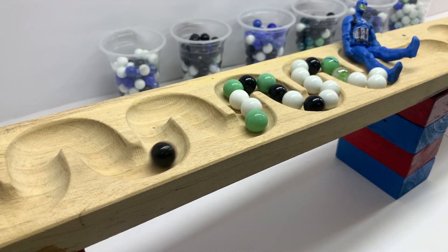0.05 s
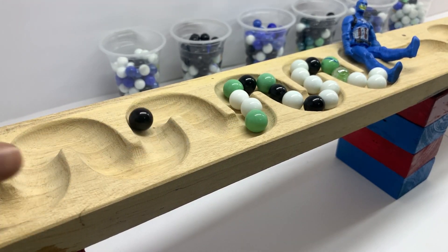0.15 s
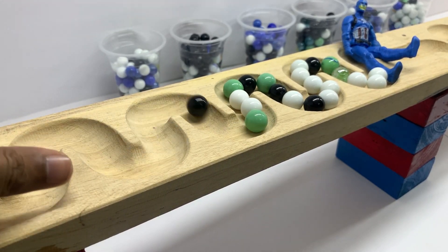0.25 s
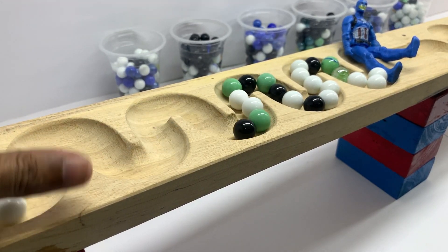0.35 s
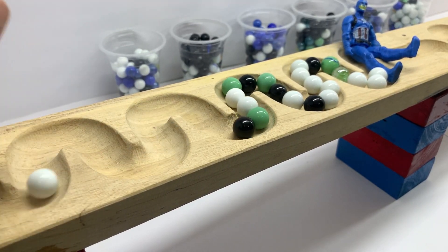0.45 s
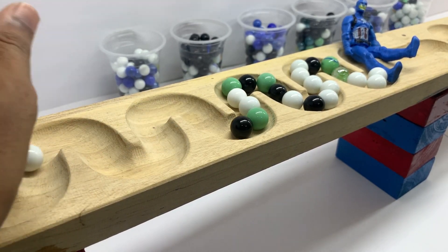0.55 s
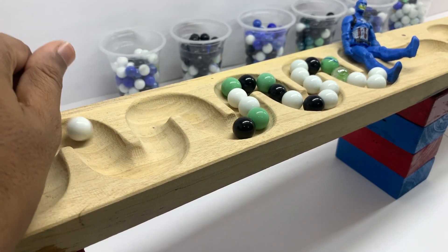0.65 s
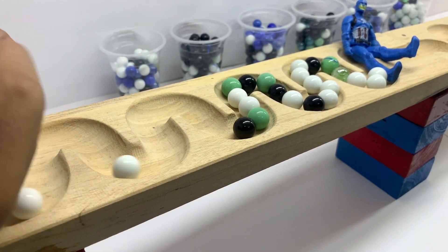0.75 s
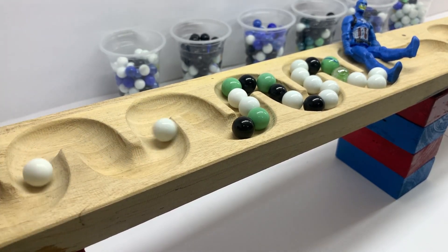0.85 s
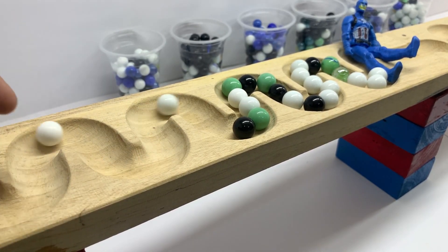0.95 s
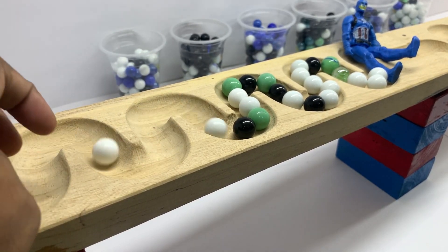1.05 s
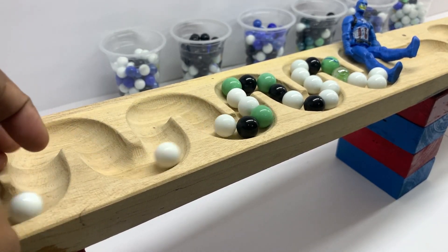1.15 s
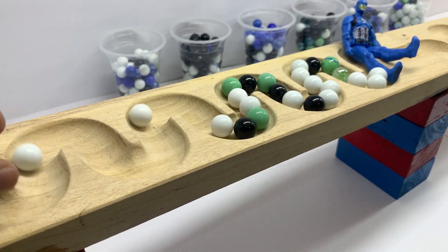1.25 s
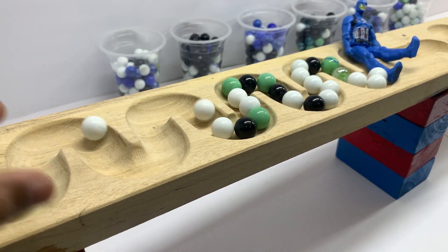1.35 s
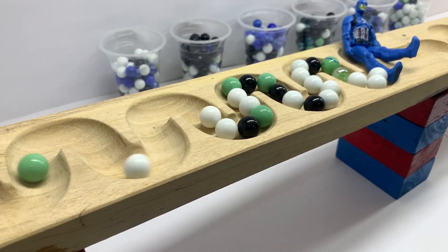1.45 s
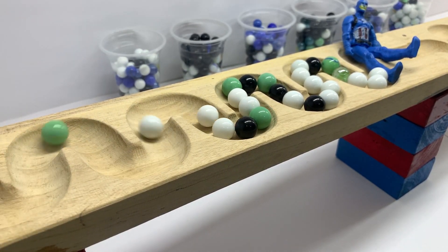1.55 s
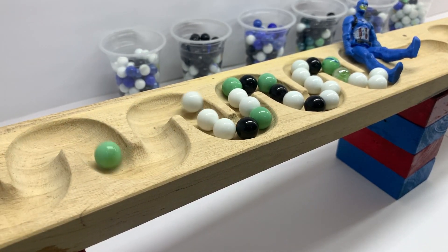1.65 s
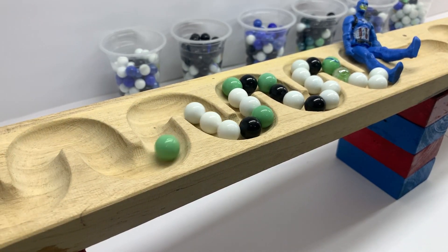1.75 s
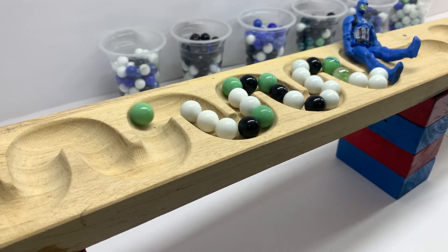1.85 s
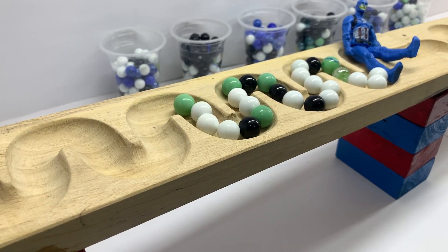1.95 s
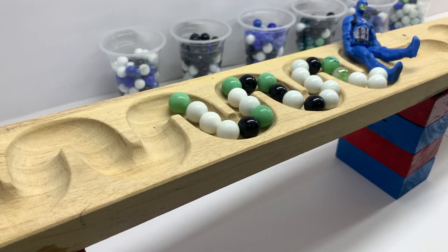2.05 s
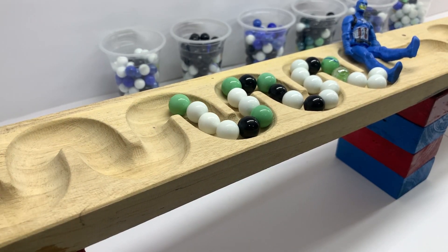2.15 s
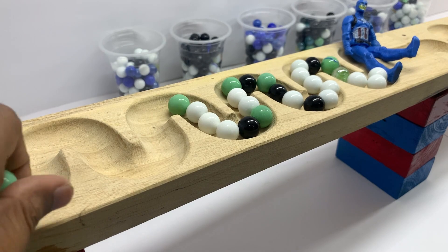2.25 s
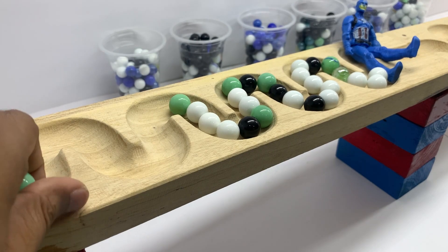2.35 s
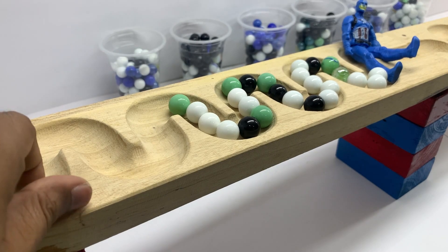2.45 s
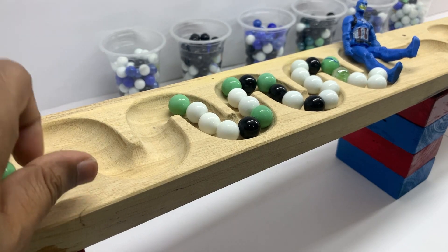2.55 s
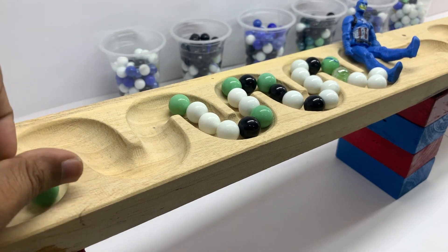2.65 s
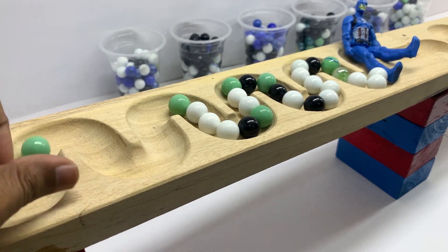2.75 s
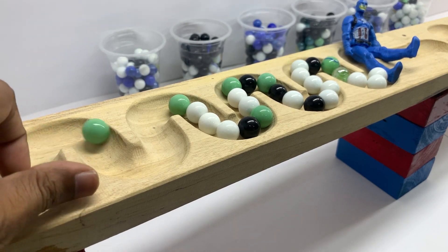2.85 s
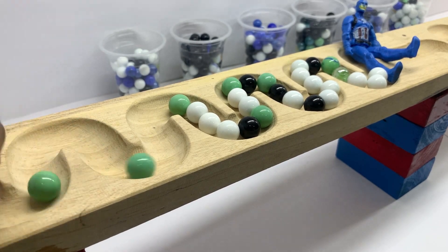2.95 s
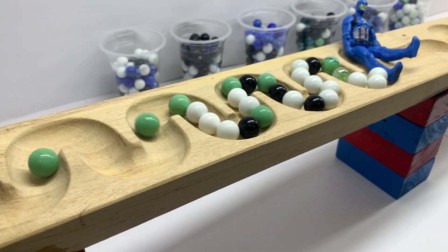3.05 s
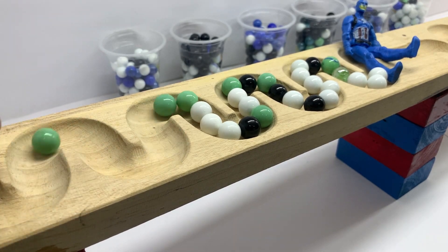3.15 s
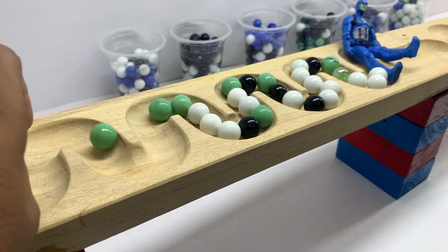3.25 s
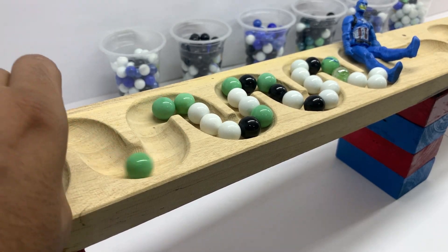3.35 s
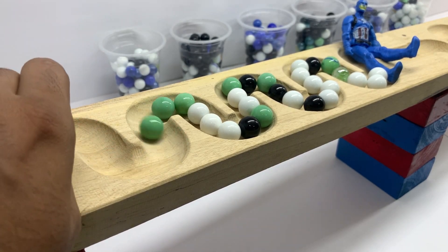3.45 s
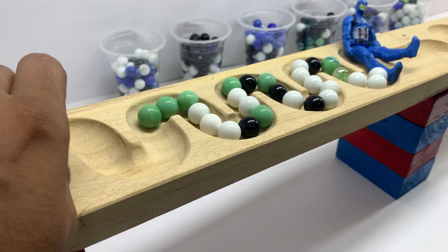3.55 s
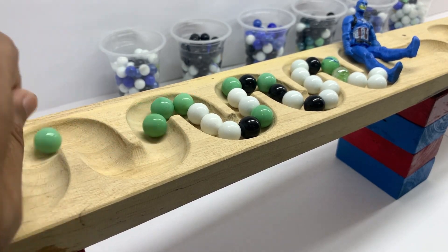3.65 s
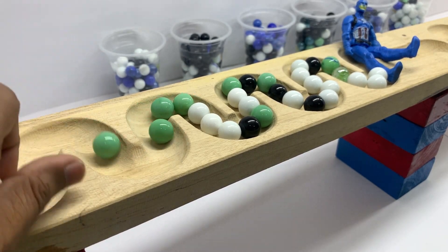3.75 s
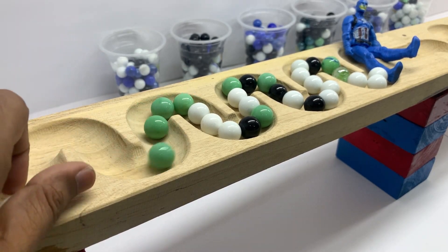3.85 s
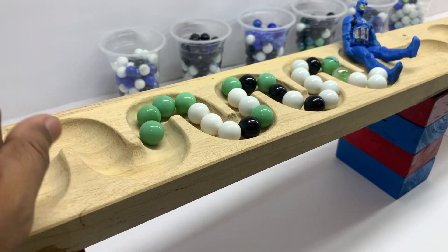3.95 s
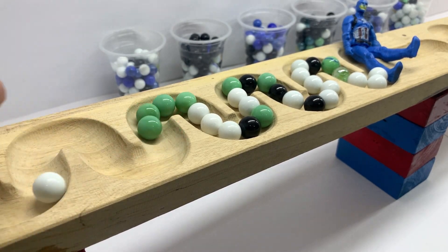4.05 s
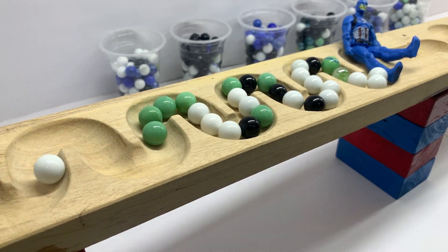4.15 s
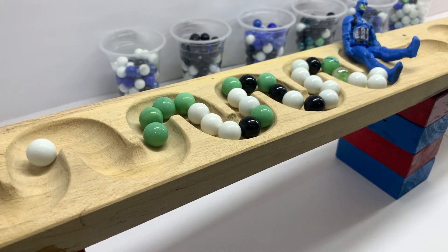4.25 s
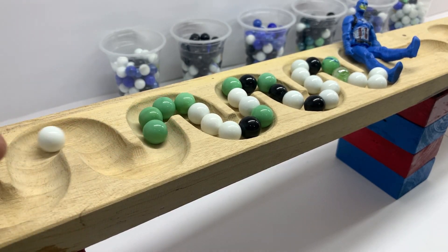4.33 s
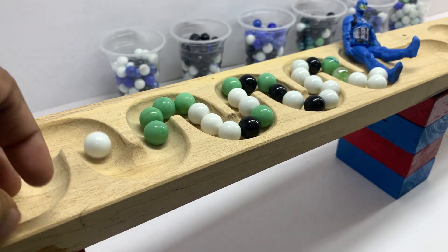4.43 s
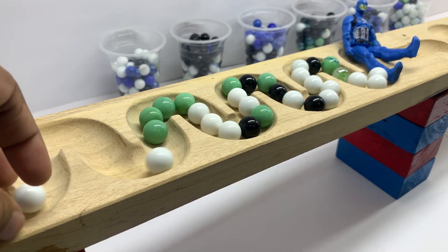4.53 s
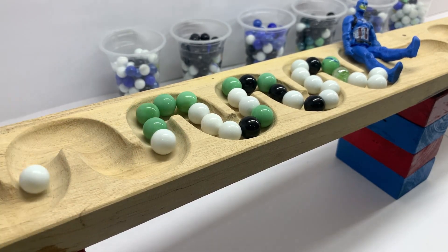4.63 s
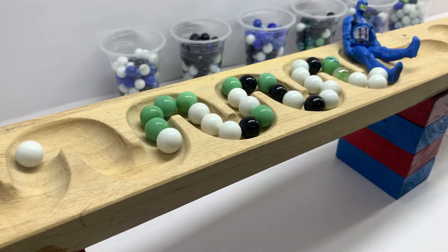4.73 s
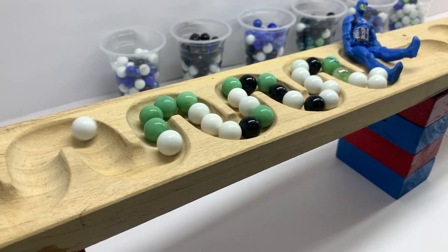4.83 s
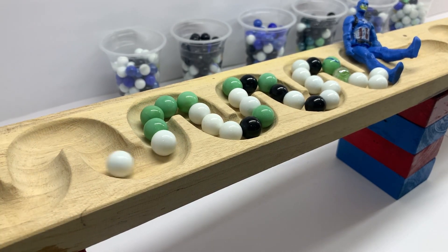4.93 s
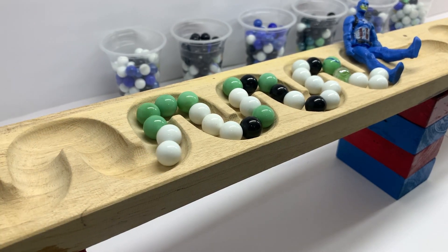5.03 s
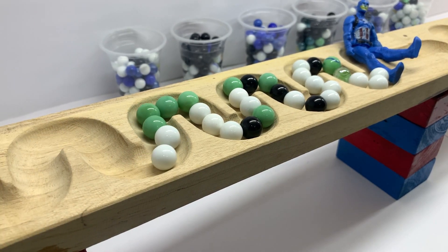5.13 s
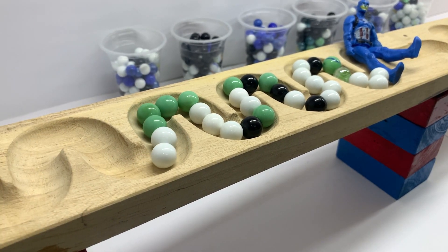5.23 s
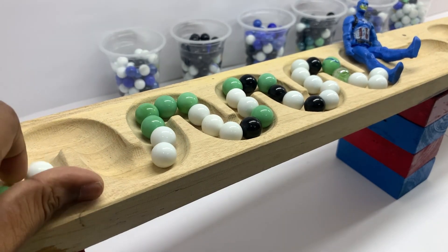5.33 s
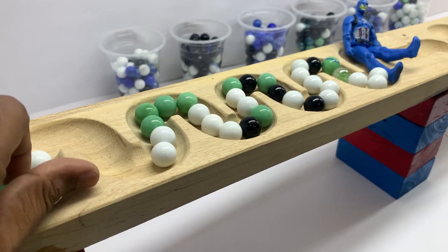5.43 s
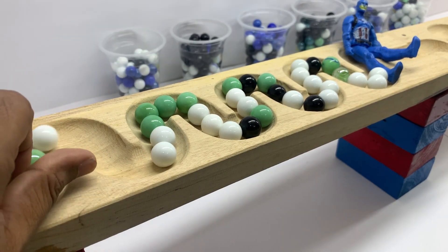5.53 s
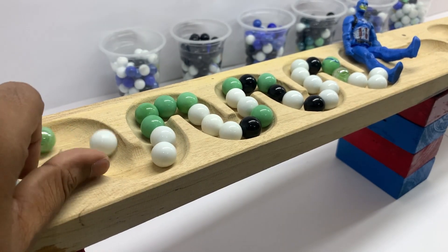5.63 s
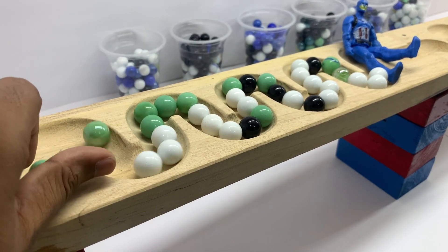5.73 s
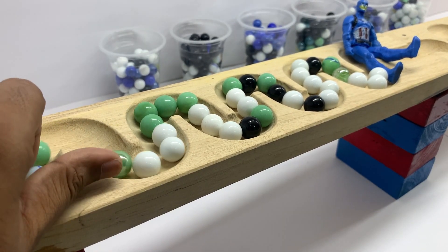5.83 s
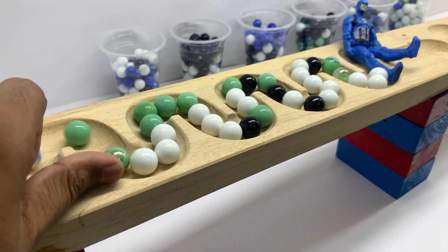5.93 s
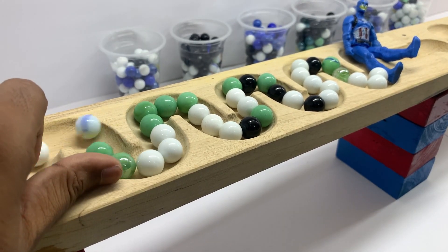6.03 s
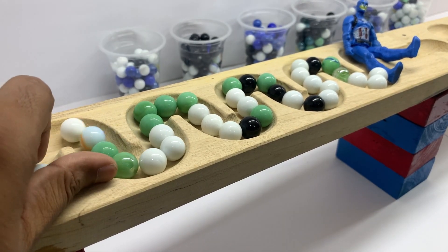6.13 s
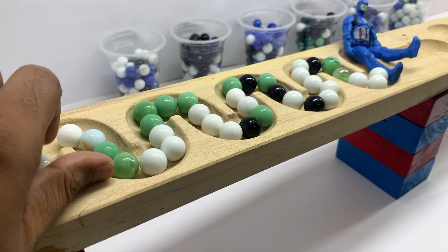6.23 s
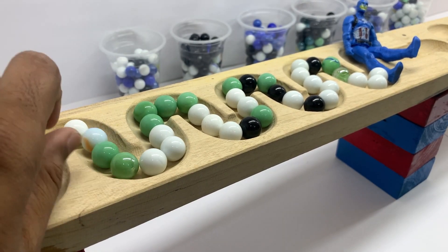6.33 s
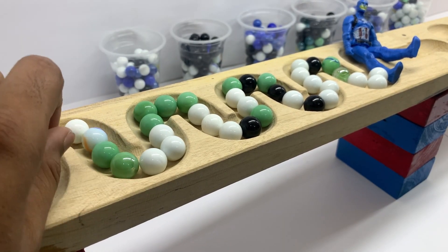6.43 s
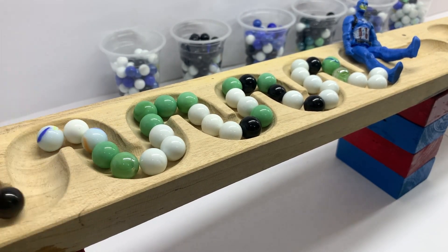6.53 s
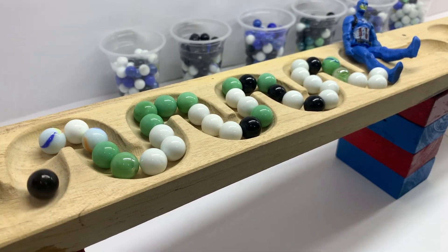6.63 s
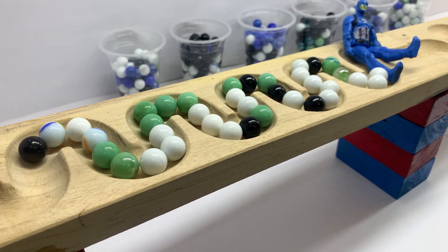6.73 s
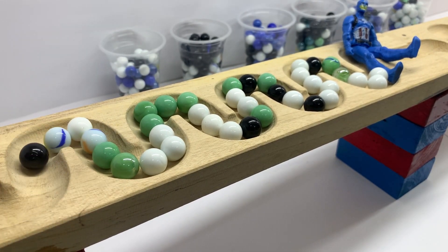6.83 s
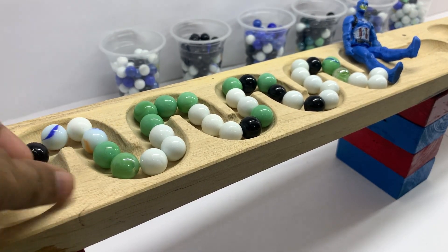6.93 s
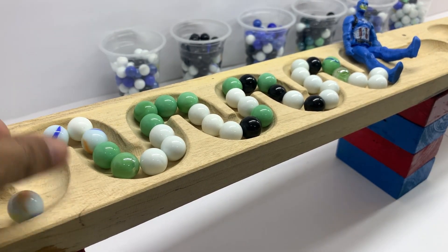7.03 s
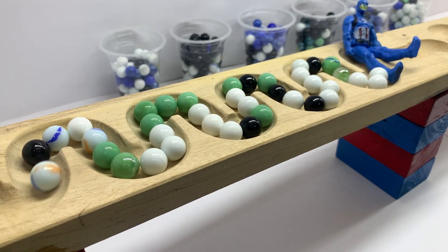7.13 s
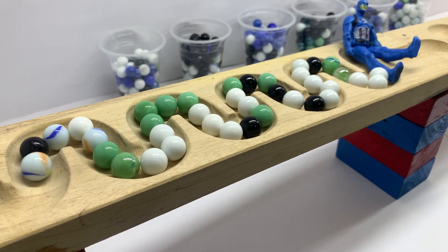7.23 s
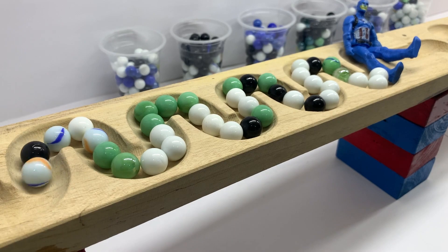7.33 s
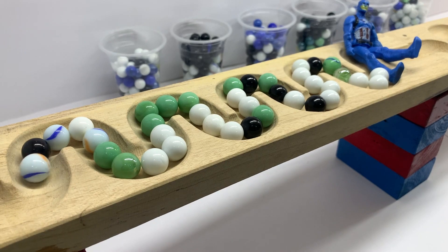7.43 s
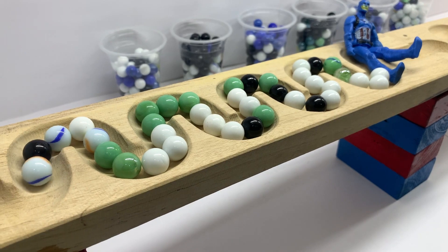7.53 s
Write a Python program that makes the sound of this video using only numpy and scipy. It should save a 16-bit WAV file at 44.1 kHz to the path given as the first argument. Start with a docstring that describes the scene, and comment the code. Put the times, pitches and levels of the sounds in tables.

```python
"""A marble is first heard already rumbling over wooden grain, soon followed by knocks and sharp glass clicks.
Glass marbles roll down a winding track carved in a plank, close to two microphones in a quiet room.
Rolling is a stream of tiny bumps that swells in the bends; knocks ring the modes of the plank;
clicks are brief, bright contacts of glass on glass in the queue. Some contacts are crisp, others a blurred swell.
Softer taps, low jolts, a drone of the plank, short grainy bursts of noise, an echo and room air complete it."""
import sys
import numpy as np
from scipy import signal
from scipy.fft import rfft, irfft, next_fast_len
from scipy.io import wavfile
from scipy.ndimage import uniform_filter1d, map_coordinates

SR = 44100
rng = np.random.default_rng(int(sys.argv[2]) if len(sys.argv) > 2 else 0)


def master_out(mix):
    """Clip the mix to full scale and print it as 16-bit PCM to the path in sys.argv[1]."""
    frames = np.transpose(np.atleast_2d(mix))
    ceiling = np.clip(frames, -1, 1)
    pcm = np.round(ceiling * 32767).astype(np.int16)
    wavfile.write(sys.argv[1], SR, pcm)


N = 334267


def amp(db):
    """Level law: decibels to amplitude gain."""
    return 10 ** (np.asarray(db) / 20)


def unit(x):
    """Power normalization: x scaled to rms 1."""
    return x / np.sqrt(np.mean(x ** 2) + 1e-20)


def along(points, hz):
    """Logarithmic interpolation: (Hz, value) points read on a log frequency axis."""
    f, v = np.transpose(points)
    return np.interp(np.log(hz + 1), np.log(f), v)


def grid():
    """Discrete spectrum: the frequencies in Hz on which all responses are given."""
    return np.fft.rfftfreq(2 * next_fast_len(N // 2 + SR // 4), 1 / SR)


def filtered(x, response):
    """Linear filtering: the spectrum of x times a complex response."""
    size = 2 * (len(response) - 1)
    return irfft(rfft(x, size) * response)[..., :N]


def colour(points):
    """Minimum phase: the causal response of unit power with a given spectrum, by way of its cepstrum."""
    gain = unit(amp(along(points, grid())))
    cepstrum = irfft(np.log(gain))
    half = len(cepstrum) // 2
    folded = np.r_[cepstrum[0], 2 * cepstrum[1:half], cepstrum[half]]
    return np.exp(rfft(folded, 2 * half))


def resonances(modes):
    """Modal superposition: a sum of damped resonances with alternating signs, at unit power."""
    f = grid()
    h = 0
    for k, (hz, width, db) in enumerate(modes):
        damping = 1j * f * width
        h = h + (-1) ** k * amp(db) * damping / (hz * hz - f * f + damping)
    return h / np.sqrt(np.mean(abs(h) ** 2))


# Likeness of the two microphones. Each row: frequency in Hz, left-right coherence from 0 to 1.
COHERENCE = [(100, .85), (350, 0.67), (900, 0.12), (3000, 0.063), (10000, 0.28)]


def spread(pair):
    """Partial coherence: two unrelated signals mix into a partly alike left and right."""
    turn = np.arccos(np.clip(along(COHERENCE, grid()), 0, 1)) / 2
    mid = filtered(pair[0], np.cos(turn))
    side = filtered(pair[1], np.sin(turn))
    return np.array([mid + side, mid - side])


def wandering(x, depth_db, size, steady_hz=1500):
    """Moving excitation: as the contact point moves, upper peaks and dips drift; size is their width in bins."""
    hz, _, z = signal.stft(x, SR, nperseg=512)
    field = uniform_filter1d(rng.standard_normal(z.shape[-2:]), size, axis=0)
    field = uniform_filter1d(field, size=16, axis=1)  # slow in time
    upper_share = (hz / (hz + steady_hz))[:, None]
    drift_db = depth_db * upper_share * np.tanh(unit(field))
    return signal.istft(z * unit(amp(drift_db)), nperseg=512)[1][..., :N]


def swells(table):
    """Power addition: the summed power of bell-shaped swells."""
    t = np.arange(N) / SR
    power = np.zeros(N)
    for s, half_s, db in table:
        near = slice(*np.searchsorted(t, [s - 4 * half_s, s + 4 * half_s]))
        power[near] += amp(db) ** 2 * np.exp(-((t[near] - s) / half_s) ** 2)
    return power


def blows(table, fall_s, spike_db):
    """Soft impact: a low-passed push with a short, fading shudder of noise; a lower cutoff is duller."""
    t = np.arange(SR // 4) / SR
    force = np.zeros(N + SR)
    for s, db, bright_hz in table:
        shudder = np.exp(-t / fall_s) * rng.standard_normal(len(t))
        push = amp(spike_db) * (t == 0)
        softness = signal.butter(2, min(bright_hz, SR / 2 - 1), fs=SR)
        force[int(s * SR):][:len(t)] += amp(db) * signal.lfilter(*softness, shudder + push)
    return force[:N]


def contacts(table, scatter_s, scatter_db, rise_s, fall_s, onset_s):
    """Impulse and scattering: a spike, its scatter off nearby surfaces and a blurred swell; rms over 10 ms."""
    lead = SR // 20  # a swell starts before its contact
    t = np.arange(-lead, 2 * lead) / SR
    spikes, haze = np.zeros(N), np.zeros((2, N + SR))
    scatter = unit((t > 0) * np.exp(-abs(t) / scatter_s)) * amp(scatter_db)
    swell = unit(np.exp(np.where(t < 0, t / rise_s - (t / onset_s) ** 4, -t / fall_s)))
    for s, crisp_db, blur_db in table:
        i = int(s * SR)
        spikes[i] = amp(crisp_db)
        envelope = np.hypot(amp(crisp_db) * scatter, amp(blur_db) * swell) / np.sqrt(len(t))
        haze[:, i:i + len(t)] += envelope * rng.standard_normal((2, len(t)))
    return np.sqrt(SR / 100) * (spikes + spread(haze[:, lead:lead + N]))


# Spectrum of the room air. Each row: frequency in Hz, relative density in dB per Hz.
AIR_SPECTRUM = [(20, -12.5), (45, -22), (68, 6), (95, -5), (128, 7), (190, -14.5), (340, -3.5), (430, -16),
                (950, -18), (1600, -35), (16000, -37)]


def air():
    """Stationary noise: the low steady murmur of the room."""
    return amp(-48.0) * filtered(spread(rng.standard_normal((2, N))), colour(AIR_SPECTRUM))


# Decay of the room's echo. Each row: frequency in Hz, time to fall by 60 dB in seconds.
ROOM_DECAY = [(150, 0.3), (700, 0.2), (4500, 0.13), (12000, 0.081)]


def room(x):
    """Diffuse reverberation: a short echo of decaying noise whose treble dies first."""
    hz, t, z = signal.stft(rng.standard_normal((2, SR // 2)), SR, nperseg=256)
    decay = amp(-60 * t / along(ROOM_DECAY, hz)[:, None])
    tail = signal.istft(z * decay, SR, nperseg=256)[1]
    tail = tail / np.linalg.norm(tail[0])
    tail = np.pad(tail, ((0, 0), (SR // 200, 0)))  # the echo starts 5 ms late
    return signal.fftconvolve(x, tail, axes=1)[:, :N]


# One marble's run down the track. Each row: start in seconds, length in seconds, relative rattle level in dB.
RUN_TABLE = [(-0.08, 0.53, -35.5), (0.48, 0.18, -45.5), (0.624, 0.25, -38.5), (0.902, 0.98, -37),
             (2.7, 1.375, -44), (4.338, .3, -39.5), (4.79, 0.25, -38), (5.233, 0.84, -42)]
RUN_ATTACK_S, RUN_RELEASE_S = 0.038, 0.0082  # gathering speed, coming to rest
# A marble sweeps through a bend and presses harder on the wood.
# Each row: centre in seconds, half length in seconds, relative rattle level in dB.
BEND_SWELLS = [(0.252, 0.012, -27), (1.005, 0.034, -32), (1.09, 0.017, -28.5), (1.63, 0.018, -36.5),
               (1.945, 0.017, -27), (2.775, 0.035, -45), (3.02, 0.032, -36), (3.149, 0.013, -25),
               (3.262, 0.013, -34), (3.335, 0.008, -31), (3.398, 0.02, -31), (3.7, 0.017, -33.5),
               (3.757, 0.019, -34.5), (4.535, .028, -26.5), (5.7, 0.026, -32.5), (6.622, 0.018, -38.5)]
REST_DB = -64.5  # faint stirring of the marbles at rest, on the same relative scale


def rolling_db():
    """Power addition: every run rises, holds and dies away; every bend adds a short swell."""
    t = np.arange(N) / SR
    power = swells(BEND_SWELLS) + amp(REST_DB) ** 2
    for s, length, db in RUN_TABLE:
        rise = np.clip((t - s) / RUN_ATTACK_S, 0, 1)
        fall = np.exp(-np.maximum(t - s - length, 0) / RUN_RELEASE_S)
        power += (amp(db) * rise * fall) ** 2
    return 10 * np.log10(power)


# The plank under a rolling marble. Each row: frequency in Hz, relative density in dB per Hz.
GRAIN_SPECTRUM = [(120, -31.5), (260, -7), (400, 1), (530, -5.5), (780, 1), (1780, -1.5), (2300, -8.5),
                  (2750, -1), (3200, -19.5), (4200, -25.5), (6000, -50.5)]


def rattle(level_db, dull_hz, bumps_per_s=340, uneven_db=4, smooth_db=0.0, waver_db=7.0,
           brightens=0.084, brisk_db=-35):
    """Rolling contact: a random stream of tiny bumps over the grain, brighter when brisk."""
    # the rattle's level wavers at random, quickly and unevenly: 65 random levels per second, joined by lines
    waver = np.tanh(map_coordinates(rng.standard_normal(N), [np.arange(N) * 65 / SR], order=1))
    bump_db = uneven_db * np.clip(rng.standard_normal(N), -2, 1)
    bumps = unit((rng.random(N) < bumps_per_s / SR) * amp(bump_db))
    hiss = amp(smooth_db) * spread(rng.standard_normal((2, N)))
    force = (bumps + hiss) * amp(level_db + waver_db * waver - 2.5)
    sound = filtered(wandering(force, depth_db=6.5, size=3, steady_hz=500), colour(GRAIN_SPECTRUM))
    body = filtered(sound, 1 / (1 + 1j * grid() / dull_hz))
    # treble lost in dB per dB of level below brisk
    treble_gain = amp(brightens * np.minimum(level_db - brisk_db, 0))
    sound = body + (sound - body) * treble_gain
    return sound * amp([[.5], [-.5]])  # slightly left


# The plank's lowest bending tones. Each row: frequency in Hz, relative density in dB per Hz.
DRONE_SPECTRUM = [(50, -23), (125, -6.5), (148, -6.5), (163, 4.5), (205, -16), (900, -47)]
# the queue grows, so the marbles stop ever farther from the plank's supple middle
DRONE_DB, DRONE_FALL_DB_PER_S = -16, 0.64
# The plank murmurs as the hand moves at its upper end.
# Each row: centre in seconds, half length in seconds, relative level in dB.
MURMUR_SWELLS = [(2.39, 0.025, -45), (4.52, 0.048, -42.5)]
# The whole plank jolting on its supports. Each row: start in seconds, relative level in dB.
THUMP_JOLTS = [(0.245, -29), (0.322, -16.5), (0.378, -25), (1.092, -17.5), (1.942, -26.5), (3.052, -26),
               (5.321, -25), (6.613, -28), (6.998, -28), (7.06, -29)]


def drone(level_db, dull_hz, follows=0.76):
    """Forced bending: noise that follows the rolling, murmurs and jolts excite the plank's lowest tones."""
    drone_db = DRONE_DB - DRONE_FALL_DB_PER_S * np.arange(N) / SR
    rolling_power = amp(follows * level_db + drone_db) ** 2
    bending = spread(rng.standard_normal((2, N))) * np.sqrt(rolling_power + swells(MURMUR_SWELLS))
    jolts = blows([(s, db, dull_hz) for s, db in THUMP_JOLTS], fall_s=0.009, spike_db=22.0)
    return filtered(bending + amp(-5.5) * jolts, colour(DRONE_SPECTRUM))


def rolling(dull_hz=1200):
    """Coupled vibration: the rattle over the grain and the plank's drone share one rolling level."""
    level_db = rolling_db()
    return rattle(level_db, dull_hz) + drone(level_db, dull_hz)


# A marble hops over a ridge or rocks in its hollow. Each row: start in seconds, relative level in dB.
TAP_BLOWS = [(0.01, -23), (0.609, -24), (0.895, -21.5), (1.291, -22), (1.327, -22.5), (2.721, -35),
             (4.033, -24.5), (4.111, -23.5), (4.146, -28.5), (4.219, -31), (4.265, -30.5), (4.309, -30.5),
             (4.39, -25.5), (4.427, -26), (4.846, -28.5), (4.934, -26.5), (4.986, -28), (5.664, -26),
             (7.002, -34)]
TAP_HZ, TAP_REF_DB = 4500, -22.5  # cutoff of a tap of this strength; it rises and falls with the force


def taps():
    """Force-dependent softness: a drop over a ridge is a duller blow that barely rings the plank."""
    table = [(s, db, TAP_HZ * amp(db - TAP_REF_DB)) for s, db in TAP_BLOWS]
    force = blows(table, fall_s=0.0081, spike_db=10.0)
    return filtered(force, amp(0.5) * colour(GRAIN_SPECTRUM) + amp(-12.5) * resonances(PLANK_MODES))


# Short flat bursts of broadband, grainy noise around some contacts.
# Each row: start in seconds, length in seconds, glass-coloured level in dB, wood-coloured level in dB.
GRAINY_BURSTS = [(1.423, 0.089, -30, -40.5), (5.237, 0.045, -18.5, -25.5), (5.881, .035, -20, -38),
                 (6.056, .045, -26.5, -39), (6.997, 0.033, -29.5, -49)]


def grainy_bursts(ticks_per_s=450, uneven_db=4, edge_s=0.0054):
    """Gated noise: random dense ticks and noise, coloured like glass and wood, within short gates."""
    t = np.arange(N) / SR
    tick_db = uneven_db * np.clip(rng.standard_normal((2, N)), -2, 2)
    ticks = (rng.random((2, N)) < ticks_per_s / SR) * amp(tick_db)
    grains = spread(unit(unit(ticks) + rng.standard_normal((2, N))))
    glass, wood = np.zeros(N), np.zeros(N)
    for s, length, glass_db, wood_db in GRAINY_BURSTS:
        gate = np.clip(np.minimum(t - s, s + length - t) / edge_s + .5, 0, 1)
        glass += amp(glass_db) * gate
        wood += amp(wood_db) * gate
    return filtered(grains * glass, colour(GLASS_SPECTRUM)) + filtered(grains * wood, colour(CRACK_SPECTRUM))


# A marble strikes the wood. Each row: start in seconds, crisp knock in dB, blurred swell in dB,
# dry crack in dB relative to the ring, upper modes in dB over the lower ones.
KNOCK_HITS = [(0.3343, -26, -31, -22.5, -22), (0.3828, -36, -12.5, -11.5, -10),
              (0.4268, -30, -19.5, -4.5, 1.5), (0.65, -23.5, -12.5, 0, -19), (0.662, -21.5, -27, -4.5, -8),
              (0.706, -15.5, -23.5, -7, 4.5), (0.7332, -17.5, -26, -12, -9),
              (1.1343, -18.5, -17, -3.5, -9.5), (1.1443, -20.5, -19.5, -8, 3),
              (1.1664, -15, -24.5, -9.5, 2.5), (1.3743, -12.5, -12.5, -7.5, 6),
              (1.4382, -22.5, -21.5, -9.5, -4), (2.452, -14.5, -16.5, -18, 7.5),
              (2.462, -15.5, -8.5, -20, 0.5), (2.8409, -12.5, -6.5, -13, 3.5), (3.5223, -11.5, -15, -8, 3),
              (3.5323, -21.5, -17.5, 4.5, 10), (3.5697, -17, -23.5, -6, -5),
              (3.604, -26, -24, -19.5, -10.5), (3.806, -20, -6, -17.5, 2), (3.8152, -18, -15.5, -7.5, 6.5),
              (5.3063, -24.5, -48, 3, 11), (5.3184, -14, -28.5, -7.5, 5), (5.333, -21.5, -12.5, -8, -1),
              (5.3681, -14, -20, -8.5, -4), (5.4417, -22, -20, -15.5, -2), (5.472, -17, -18, -3, -4.5),
              (5.495, -37.5, -18, -14, -4.5), (5.732, -22.5, -11.5, -3.5, -1), (5.7477, -23, -15.5, -7, 3),
              (5.7913, -38, -22.5, -1.5, -14.5), (5.919, -19.5, -16, -7, -14),
              (5.9362, -17.5, -15, -9.5, 1.5), (5.99, -23.5, -20, -9, -23.5), (6.378, -17, -9, -5, 4),
              (6.4115, -15, -20.5, -1, -1.5), (7.06, -15, -16, -7.5, -10.5), (7.1084, -16, -14, -15.5, 2)]
# Resonances of the struck plank. Each row: frequency in Hz, width in Hz, relative level in dB.
PLANK_MODES = [(161.5, 34, -10), (377, 65, -9.5), (578, 98, -13), (1140, 190, -12), (1324, 78, -9.5),
               (1722, 150, -6.5), (2190, 45, 2), (2493, 230, -1.5), (2720, 140, 5.5), (2837, 130, -2.5),
               (3301, 65, 3.5), (3684, 230, -8.5), (3920, 200, -13), (4263, 83, -1)]
# The dry crack of a knock. Each row: frequency in Hz, relative density in dB per Hz.
CRACK_SPECTRUM = [(50, -9.5), (200, -6), (1500, -1.5), (2800, 4.5), (4250, 4.5), (4680, -8.5), (5000, 0),
                  (7000, -9), (10000, -7), (11500, -20.5), (16000, -26)]
UPPER_HZ = 3050  # the spot that is struck favours the modes above or below this


def knocks():
    """Modal excitation: a wall hit rings the modes its spot favours; a hard spot adds a dry crack."""
    s, crisp, blur, hard, tilt = np.transpose(KNOCK_HITS)

    def strike(db):
        """Superposition: the knocks with each one's level shifted by db."""
        return contacts(zip(s, crisp + db, blur + db), scatter_s=0.004, scatter_db=-3.5,
                        rise_s=0.013, fall_s=0.011, onset_s=0.019)

    # the mean power of lower and upper stays the same whatever the tilt
    lower_db = -10 * np.log10((1 + amp(tilt) ** 2) / 2)
    lower, upper, crack = strike(lower_db), strike(lower_db + tilt), strike(hard)
    ring = upper + filtered(lower - upper, 1 / (1 + (grid() / UPPER_HZ) ** 50))
    wood = filtered(wandering(ring, depth_db=2.5, size=3), resonances(PLANK_MODES))
    wood = wood + filtered(crack, colour(CRACK_SPECTRUM))
    return wood * amp([[.6], [-.6]])  # slightly left


# A marble runs into the queue or rebounds on it.
# Each row: start in seconds, crisp click in dB, blurred swell in dB, both before the gain in clicks().
CLICK_HITS = [(0.085, -19, -19), (0.383, -17, -8.5), (0.4113, -17, -13), (0.4217, -23, -23),
              (0.4377, -19, -29.5), (0.4517, -17.5, -28), (1.1062, -22.5, -10.5), (1.1166, -16, -21.5),
              (1.1366, -16, -29.5), (1.2573, -28, -33), (1.2746, -31, -50.5), (1.412, -12.5, -27),
              (1.432, -24.5, -30.5), (1.4619, -25.5, -21), (1.4803, -28, -39), (1.5342, -16.5, -26),
              (1.6674, -30, -51.5), (1.712, -9, -4.5), (1.739, -16, -19.5), (1.7675, -23.5, -9.5),
              (1.8405, -11, -14.5), (1.8809, -27.5, -21), (1.9563, -17.5, -11.5), (1.9772, -14, -36.5),
              (2.1124, -27.5, -17.5), (3.0448, -26, -21.5), (3.1495, -32, -6), (3.172, -21.5, -25),
              (3.1788, -17.5, -27), (3.5237, -26, -14.5), (3.9457, -19, -12.5), (3.9675, -13, -29),
              (4.0315, -20.5, -34), (4.3418, -27.5, -40.5), (4.5065, -25, -35.5), (4.6167, -11.5, -13.5),
              (4.6297, -19, -18), (4.6446, -30.5, -39), (4.6666, -24, -20), (4.697, -17, -29),
              (4.7793, -32.5, -46), (5.041, -28.5, -11), (5.0495, -18, -22.5), (5.0896, -21.5, -44),
              (5.2124, -22, -22.5), (5.3066, -22, -43), (5.4403, -42.5, -12), (5.5246, -21, -47),
              (5.7601, -16.5, -17.5), (5.8504, -21.5, -15), (5.9163, -17, -11.5), (6.033, -17, -19),
              (6.1073, -15, -20.5), (6.1547, -14.5, -19.5), (6.1705, -25.5, -39), (6.1986, -17, -25.5),
              (6.3257, -39.5, -53.5), (6.5663, -26, -34.5), (6.706, -16.5, -10.5), (6.7257, -19, -37),
              (6.744, -24.5, -17), (6.77, -23, -34.5), (6.7798, -20, -40), (6.9973, -26.5, -43),
              (7.2008, -24.5, -15), (7.2432, -19.5, -51), (7.4146, -39, -51.5), (7.4657, -26, -38)]
# The click of glass on glass. Each row: frequency in Hz, relative density in dB per Hz.
GLASS_SPECTRUM = [(60, -29.5), (160, -14.5), (1500, -19.5), (2600, -22), (5600, -10.5), (7800, -1.5),
                  (9000, 0.5), (10000, 3.5), (11500, -9), (13300, -7.5), (16000, -12.5)]


def clicks():
    """Brief contact, broad spectrum: glass on glass radiates mostly near 10 kHz."""
    force = contacts(CLICK_HITS, scatter_s=0.0034, scatter_db=-3.0, rise_s=0.0082, fall_s=0.011, onset_s=0.028)
    return amp(-3.5) * filtered(wandering(force, depth_db=7.0, size=3), colour(GLASS_SPECTRUM))


# How the track's sound arrives at the two microphones.
# Each row: frequency in Hz, phase in radians by which the left leads.
ARRIVAL_PHASE = [(0, -0.5), (1290, 2.5), (2150, 5.5), (3010, 11), (3270, 6.5), (5430, 8), (7750, 4.5),
                 (8530, 3), (13600, -3)]


def scene():
    """Interchannel phase: the track reaches the two microphones at different phases; the room answers faintly."""
    left, right = rolling() + taps() + grainy_bursts() + knocks() + clicks()
    lead = np.interp(grid(), *np.transpose(ARRIVAL_PHASE))
    track = np.array([filtered(left, np.exp(1j * lead)), right])
    return air() + track + amp(-13.0) * room(track)


def record(dry, top_hz=16000):
    """Saturation and band limiting: the sharpest peaks are rounded, then a steep low-pass follows."""
    rounded = dry / (1 + dry ** 4) ** (1 / 4)
    return filtered(rounded, 1 / (1 + (grid() / top_hz) ** 150))


dry = scene()
out = record(dry)
master_out(out)
```